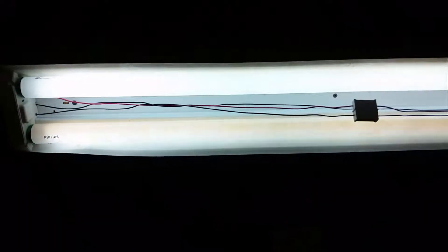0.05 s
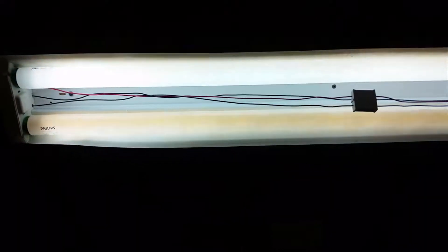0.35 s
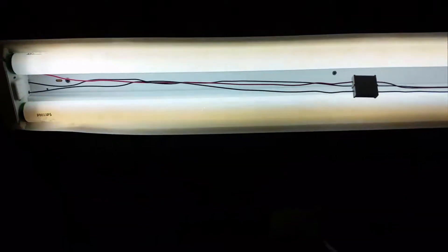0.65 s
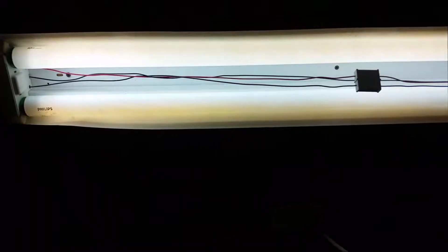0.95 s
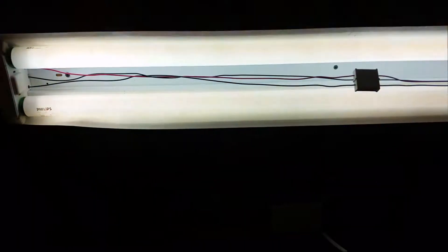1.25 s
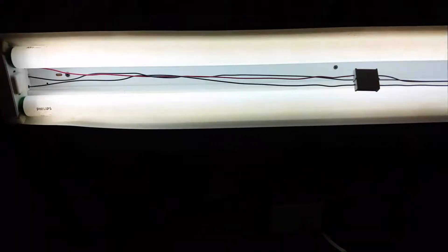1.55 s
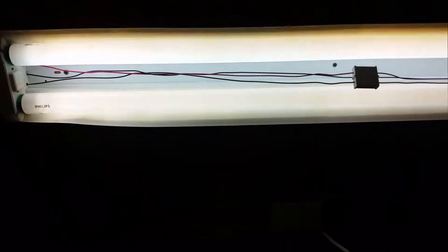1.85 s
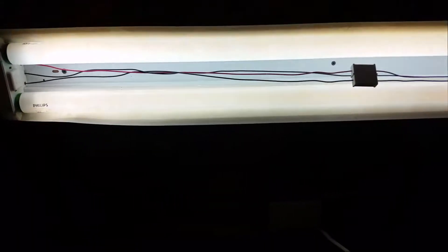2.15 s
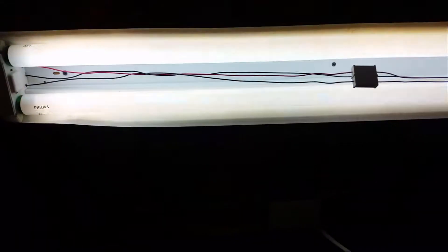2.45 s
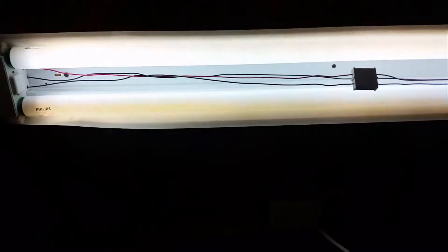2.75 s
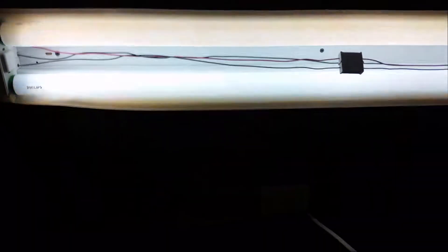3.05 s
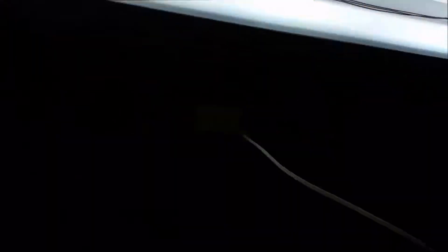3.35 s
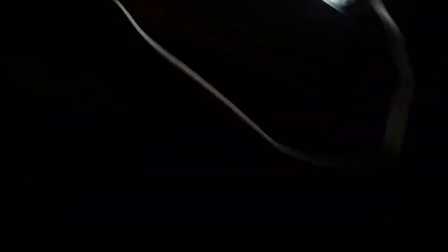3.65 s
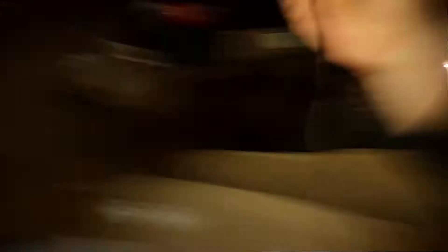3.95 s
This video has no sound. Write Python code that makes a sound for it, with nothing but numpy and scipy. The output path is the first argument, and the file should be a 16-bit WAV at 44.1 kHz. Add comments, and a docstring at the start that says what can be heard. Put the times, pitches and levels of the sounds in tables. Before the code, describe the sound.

A fluorescent light buzzes steadily, then drops away after a brief handling rub.

```python
"""Fluorescent fixture hum

The ballast drones on harmonics of half the mains rate, the metal housing rings along and a loose
part buzzes once per mains cycle. Near the end a hand-held camera swings away: a rub swells and
stops dead, the hum is left much weaker, and cloth rustles between soft bumps."""
import sys
import numpy as np
from scipy import signal
from scipy.fft import rfft, irfft
from scipy.io import wavfile

SR = 44100
rng = np.random.default_rng(int(sys.argv[2]) if len(sys.argv) > 2 else 0)


def dump_mix(stems):
    """Bounce the given channels to the path in sys.argv[1] as a 16-bit WAV at rate SR."""
    frames = np.atleast_2d(stems).T  # one column per channel
    limited = np.clip(frames, -1, 1)  # hard clip at full scale
    pcm = np.round(limited * 32767).astype(np.int16)
    wavfile.write(sys.argv[1], SR, pcm)


N = 176400
TIME = np.arange(N) / SR

MAINS_HZ = 60
STRIKE_OFFSET_S, STRIKE_RISE_S = .0012, .0009
STRIKE_AGE_S = (TIME - STRIKE_OFFSET_S) % (1 / MAINS_HZ)
GRAIN_HZ, FRICTION_MODE_WIDTH_HZ = 200, 10


def ballast():
    """Mains-locked tones, each wavering a little in phase and level."""
    # tones: multiple of half the mains rate, level/dB
    tones = [(4, -64), (5, -71.5), (6, -55.5), (7, -75), (8, -62.5), (10, -64), (11, -62), (12, -75),
             (13, -70.5), (15, -75), (16, -73.5), (17, -72), (18, -62.5), (19, -56), (20, -74), (21, -65.5),
             (22, -63), (23, -71), (24, -69), (25, -69), (26, -68.5), (27, -59), (28, -59), (30, -68.5),
             (31, -68), (34, -69), (35, -67.5), (36, -71), (38, -67.5), (39, -72.5)]
    trim_db, waver_db, waver_rad, waver_hz = 0.5, 0.58, .06, 2.1
    out = 0
    for multiple, db in tones:
        phase = 2 * np.pi * (multiple * MAINS_HZ / 2 * TIME + rng.random()) + waver_rad * drift(waver_hz)
        gain = from_db(trim_db + db + waver_db * drift(waver_hz))
        out = out + np.sqrt(2) * gain * np.sin(phase)
    return out


def housing():
    """Shaken sheet metal rings broadly and in a few narrow modes."""
    # broad ringing: f/Hz, level/dB
    spectrum = [(120, -88), (200, -80), (255, -83.5), (330, -81), (375, -87.5), (430, -89.5), (520, -80.5),
                (560, -84), (610, -86), (720, -86.5), (850, -79.5), (970, -88.5), (1080, -81.5),
                (1200, -86), (1290, -94.5), (1800, -106), (2400, -125)]
    # sharpest resonances: f/Hz, level/dB
    modes = [(285, -64.5), (527, -67), (823, -66.5), (856, -66), (1066, -66.5), (1156, -73)]
    return noise(spectrum, strikes(decay_s=0.0078, steady=0.63)) + resonances(modes, width_hz=3)


def loose_part():
    """One ringing strike per mains cycle, then a rasp that partly repeats every second cycle."""
    # strike modes: f/Hz, level/dB, decay/s
    modes = [(2070, -69, 0.0032), (2584, -64, .0025), (2830, -65.5, 0.0019), (4895, -83, .002),
             (5690, -76.5, .0014)]
    # rasp: f/Hz, level/dB
    spectrum = [(1100, -118), (1500, -102), (1850, -102), (2080, -97), (2200, -105), (2350, -106),
                (2540, -95), (2980, -99), (3150, -109), (3450, -113), (3650, -122), (4200, -128),
                (4750, -124), (4900, -118), (5100, -126), (5400, -120), (5780, -117), (6100, -138)]
    scatter_db, repeat_share = 0.4, 0.29
    rings = sum(from_db(db) * np.exp(-STRIKE_AGE_S / decay_s) * np.sin(2 * np.pi * hz * STRIKE_AGE_S)
                for hz, db, decay_s in modes)
    attack = 1 - np.exp(-STRIKE_AGE_S / STRIKE_RISE_S)
    rings = 2 * rings * attack * from_db(scatter_db * drift(MAINS_HZ))
    pattern = np.resize(rng.standard_normal(2 * SR // MAINS_HZ), N)
    rasp = np.sqrt(repeat_share) * pattern + np.sqrt(1 - repeat_share) * rng.standard_normal(N)
    return rings + colour(rasp * strikes(decay_s=0.0025, steady=0.58) * np.sqrt(SR / 2), spectrum)


def rub():
    """Grainy friction swells fast, crests slowly and stops dead."""
    # friction at its height: f/Hz, level/dB
    spectrum = [(100, -80), (220, -65), (320, -75), (450, -64), (560, -75), (800, -69.5), (1030, -69.5),
                (1400, -74), (1900, -78), (2400, -76.5), (3400, -89.5), (4700, -94), (5800, -99),
                (7000, -110), (8500, -123), (12000, -110), (13000, -114), (15500, -112)]
    # rubbed resonances: f/Hz, level/dB
    modes = [(453, -47), (726, -52.5), (1020, -48), (1345, -55), (1436, -54), (2300, -59)]
    crest_start_s, stop_s, release_s = 3.28, 3.353, 0.0021
    rise_db_per_s, crest_db_per_s, rough_db = 189, 43, 1.1
    rise_db = rise_db_per_s * np.minimum(TIME - crest_start_s, 0)
    crest_db = crest_db_per_s * (np.clip(TIME, crest_start_s, stop_s) - stop_s)
    envelope = from_db(rise_db + crest_db) * np.exp(-np.maximum(TIME - stop_s, 0) / release_s)
    friction = noise(spectrum, envelope * from_db(rough_db * drift(GRAIN_HZ)))
    return friction + resonances(modes, FRICTION_MODE_WIDTH_HZ) * envelope


def cloth():
    """A sleeve rustles as the arm comes down."""
    # rustle: f/Hz, level/dB
    spectrum = [(150, -81), (300, -80), (450, -85), (850, -87), (1350, -89.5), (1620, -88), (1900, -93.5),
                (3300, -95.5), (3900, -104), (4500, -103), (5100, -113), (5700, -111), (7000, -127),
                (8700, -140), (11000, -127), (15500, -128)]
    # brushed resonances: f/Hz, level/dB
    modes = [(750, -69), (1550, -71), (1648, -69)]
    # sleeve movement: t/s, level/dB
    movement = [(3.3, -25), (3.36, -1), (3.45, -4.5), (3.52, -1.5), (3.64, -1.5), (3.72, 3), (3.77, 1.5),
                (3.82, -4), (3.89, -2.5), (3.95, -7.5), (4.0, -10)]
    start_s, rough_db = movement[0][0], 1
    grain = from_db(rough_db * drift(GRAIN_HZ))
    rustle = noise(spectrum, grain) + resonances(modes, FRICTION_MODE_WIDTH_HZ)
    return rustle * level(movement) * (TIME > start_s)


def bumps():
    """Each soft bump of the hand rocks the camera for a cycle or two."""
    # bumps: t/s, level/dB, f/Hz
    hits = [(.455, -34, 37.6), (2.812, -30, 58), (3.058, -31.5, 48), (3.362, -33, 70), (3.397, -32, 68),
            (3.505, -36.5, 114), (3.718, -32, 83), (3.877, -36.5, 45), (3.906, -38, 263), (3.910, -29, 87)]
    rise_cycles = 0.56
    out = 0
    for start_s, db, hz in hits:
        cycles = np.maximum(TIME - start_s, 0) * hz
        age = cycles / rise_cycles
        out = out + from_db(db) * (age * np.exp(1 - age)) ** 2 * np.sin(2 * np.pi * cycles)
    return out


def knock():
    """One light knock in the room."""
    # knock: f/Hz, level/dB
    spectrum = [(150, -75), (470, -69.5), (650, -78), (850, -69.5), (1500, -73), (1900, -95), (3000, -94),
                (4200, -113), (5300, -110), (6100, -105), (6800, -126)]
    return noise(spectrum, dying(start_s=3.015, decay_s=0.023))


def case_ticks():
    """The camera case ticks in short, bright bursts."""
    # ticks: t/s, level/dB
    ticks = [(3.3334, 2), (3.3654, -11), (3.3995, 0.5), (3.8905, -3)]
    # tick colour: f/Hz, level/dB
    spectrum = [(1500, -104), (5500, -92), (7500, -96), (9000, -114), (13000, -106), (16000, -110)]
    return noise(spectrum, sum(from_db(db) * dying(start_s, decay_s=.001) for start_s, db in ticks))


def rumble():
    """Low noise of room and hand."""
    # rumble: f/Hz, level/dB
    spectrum = [(10, -86), (20, -69.5), (33, -61), (55, -67.5), (80, -68), (100, -74), (120, -75.5),
                (160, -82), (260, -92), (600, -110)]
    # its swells: t/s, level/dB
    swells = [(0, 0.5), (.7, -1.5), (2.2, 1), (2.7, 1.5), (3.3, 4.5), (3.6, 1.5), (3.75, 3), (3.82, -4.5),
              (4.0, 2)]
    return noise(spectrum) * level(swells)


def hiss():
    """Stereo microphone hiss; drops near the end."""
    # common part: f/Hz, level/dB
    mid = [(1000, -123), (7000, -123), (12000, -122.5), (16000, -123)]
    # opposite-phase part: f/Hz, level/dB
    side = [(60, -124), (200, -132), (400, -126), (2000, -130), (7000, -127.5), (11500, -129),
            (13000, -140)]
    # both parts: t/s, level/dB
    contour = [(0, 0), (3.35, 0), (3.42, -14.5), (4.0, -8)]
    return (noise(mid) + np.array([[1], [-1]]) * noise(side)) * level(contour)


def strikes(decay_s, steady):
    """Envelope of one strike per mains cycle over a steady floor; rms 1."""
    pulse = (1 - np.exp(-STRIKE_AGE_S / STRIKE_RISE_S)) * np.exp(-STRIKE_AGE_S / decay_s)
    envelope = np.hypot(steady, pulse / pulse.max())
    return envelope / np.sqrt(np.mean(envelope ** 2))


def resonances(modes, width_hz):
    """Narrow modes under random shaking."""
    out = 0
    for hz, db in modes:
        phase = 2 * np.pi * hz * TIME
        out = out + from_db(db) * (drift(width_hz) * np.sin(phase) + drift(width_hz) * np.cos(phase))
    return out


def noise(spectrum, envelope=1):
    """Enveloped noise of unit power per Hz, then coloured."""
    return colour(rng.standard_normal(N) * envelope * np.sqrt(SR / 2), spectrum)


def colour(x, spectrum):
    """Filter by (f/Hz, level/dB) rows; 20 dB per octave down beyond their ends."""
    hz, db = np.transpose(spectrum)
    octave = np.log2(np.maximum(np.fft.rfftfreq(N, 1 / SR), 1))
    outside = np.maximum(np.log2(hz[0]) - octave, 0) + np.maximum(octave - np.log2(hz[-1]), 0)
    return irfft(rfft(x) * from_db(np.interp(octave, np.log2(hz), db) - 20 * outside), N)


def drift(rate_hz):
    """Low-passed random wander of spread 1."""
    hop, settle = 40, 2000
    pole = np.exp(-2 * np.pi * rate_hz * hop / SR)
    white = rng.standard_normal(N // hop + settle + 2)
    slow = signal.lfilter([1], [1, -2 * pole, pole * pole], white)[settle:]
    return np.interp(np.arange(N) / hop, np.arange(len(slow)), slow / slow.std())


def dying(start_s, decay_s):
    """Sudden start, exponential decay."""
    return (TIME >= start_s) * np.exp(-np.maximum(TIME - start_s, 0) / decay_s)


def level(rows):
    """Gain over time from (t/s, level/dB) rows."""
    return from_db(np.interp(TIME, *np.transpose(rows)))


def from_db(db):
    """Decibels to gain."""
    return 10 ** (np.asarray(db) / 20)


def scene():
    """Fixture and handling reach two close microphones, the left one brighter."""
    # fixture at the microphones: t/s, level/dB
    fixture_level = [(0, 0.5), (2.3, -0.56), (3.0, 2), (3.345, 2), (3.365, -9), (3.8, -15.5), (4.0, -9.5)]
    # balance: f/Hz, left minus right/dB
    balance = [(500, 0), (1000, 0.49), (2000, 0.4), (2800, 2.5), (3600, 4), (4500, 7.5), (5700, 11),
               (7500, 3), (10000, -1)]
    fixture = (ballast() + housing() + loose_part()) * level(fixture_level)
    handling = rumble() + rub() + cloth() + bumps() + knock() + case_ticks()
    balance_db = np.interp(np.fft.rfftfreq(N, 1 / SR), *np.transpose(balance))
    pan = from_db([balance_db / 2, -balance_db / 2])
    return irfft(rfft(fixture + handling) * pan / pan.mean(axis=0), N) + hiss()


def record(dry):
    """Steep elliptic low-pass."""
    cutoff_hz = 15750
    return signal.sosfilt(signal.ellip(12, .1, 80, cutoff_hz, fs=SR, output="sos"), dry)


dry = scene()
out = record(dry)
dump_mix(out)
```